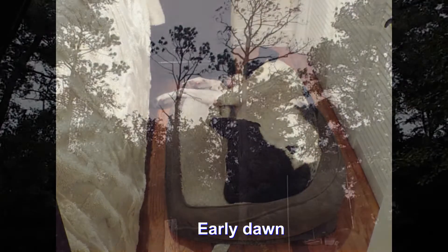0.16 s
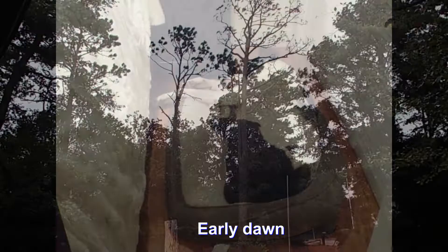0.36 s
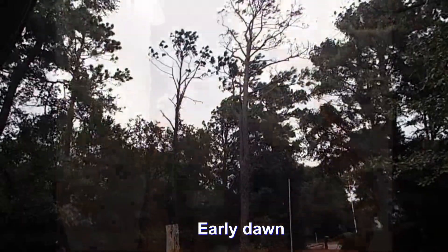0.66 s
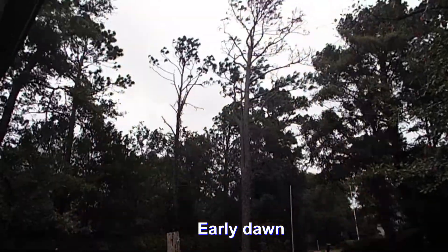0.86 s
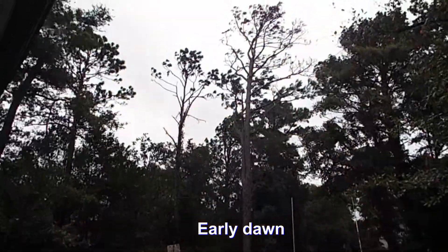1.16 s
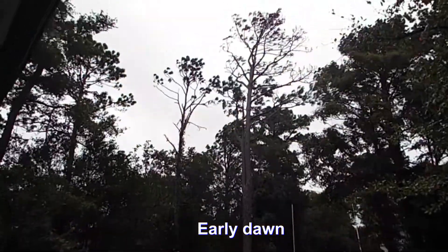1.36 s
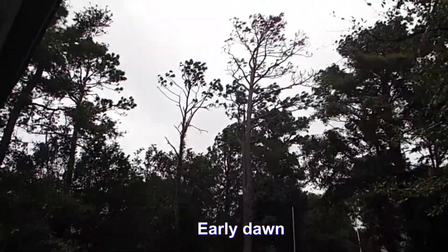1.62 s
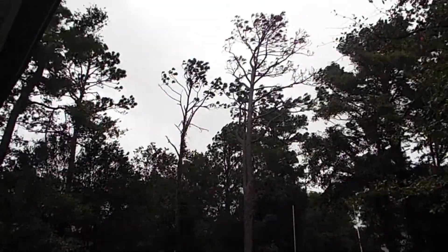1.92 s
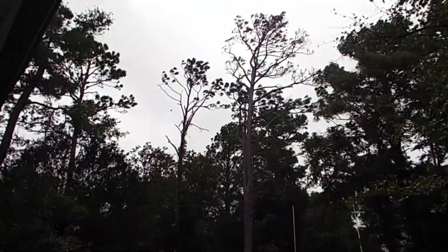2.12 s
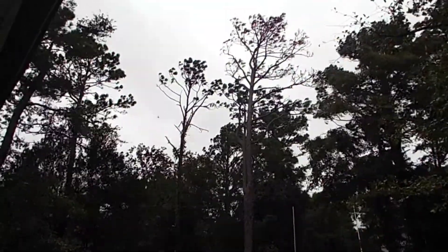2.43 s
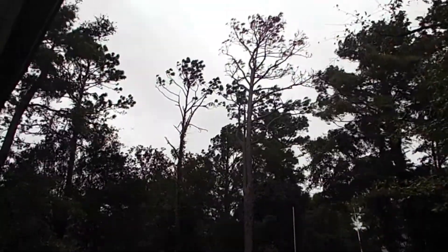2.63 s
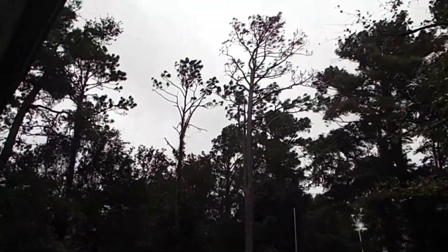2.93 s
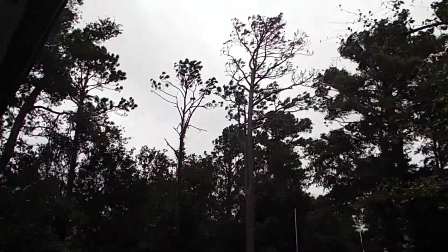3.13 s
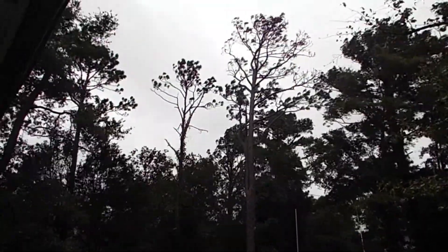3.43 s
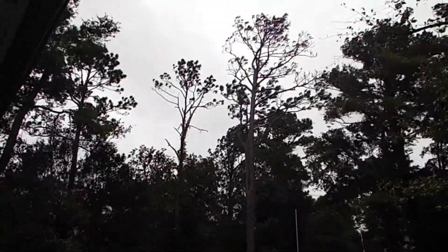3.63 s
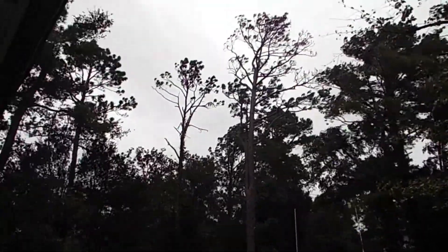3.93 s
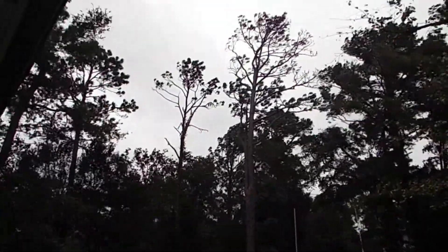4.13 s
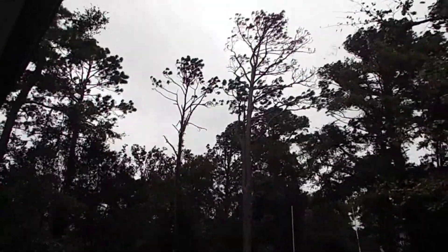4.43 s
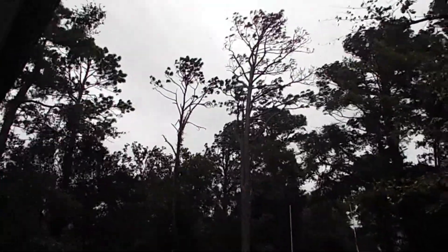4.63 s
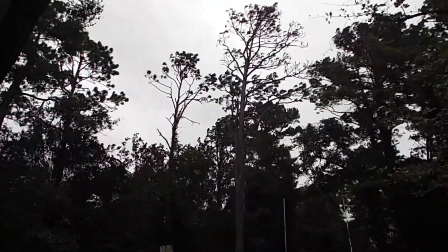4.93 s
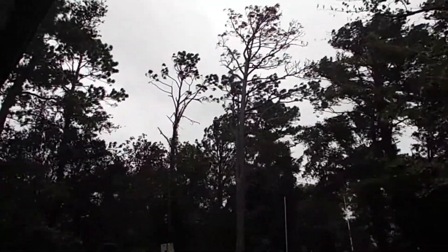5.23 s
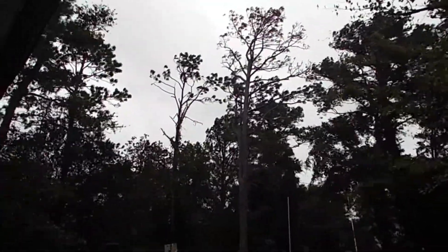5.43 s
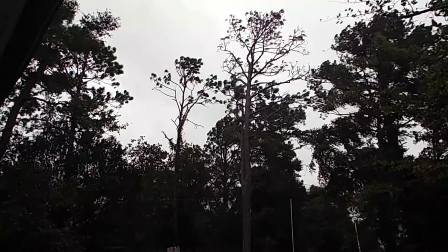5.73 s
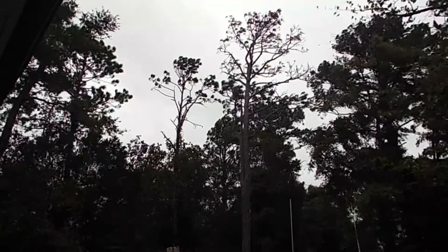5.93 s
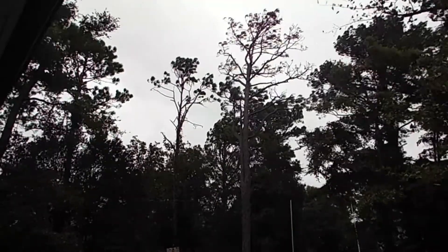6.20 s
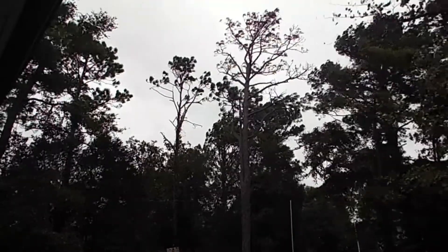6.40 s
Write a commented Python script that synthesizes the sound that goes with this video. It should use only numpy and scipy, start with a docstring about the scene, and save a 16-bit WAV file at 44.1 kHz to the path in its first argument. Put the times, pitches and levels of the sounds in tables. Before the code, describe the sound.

A storm gust builds in tall trees, needles hissing over a softer bough roar, with dry leaf ticks and faint low microphone bumps.

```python
"""A stand of tall pines: a storm gust builds, peaks after about five and a half seconds and eases.
Boughs roar, twigs rush, needles hiss and sizzle: filtered noise that follows the gust, with one short echo.
Dry leaves tick: random clicks through short resonances, denser and louder in the gust.
Eddies bump and a breeze rumbles at the microphone: low noise in short puffs and slow spells.
Its two close ports differ only in the treble and in this low wind noise."""
import sys
import numpy as np
from scipy import signal
from scipy.fft import rfft, irfft
from scipy.io import wavfile

SR = 44100
rng = np.random.default_rng(int(sys.argv[2]) if len(sys.argv) > 2 else 0)


def store_wav(level_fs):
    """Save 16-bit WAV to argv[1]."""
    pcm = np.round(np.clip(np.atleast_2d(level_fs), -1, 1) * 32767)
    wavfile.write(sys.argv[1], SR, pcm.T.astype(np.int16))


N = 289296
T = np.arange(N) / SR
HZ = np.maximum(np.arange(N // 2 + 1) * SR / N, 1)
SIDES = np.array([[1], [-1]])  # left, right

# relative colour of the wind in the trees: pitch_hz, density_db
TREE_COLOUR = [(25, -52), (100, -22.5), (180, -13.5), (310, -4), (480, -2.5), (680, -2.1), (950, -3.5),
               (2700, -5), (4100, -2), (5250, 0), (6300, -3), (7600, -7.5), (10500, -12.5), (15200, -29)]


def from_db(db):
    """Decibels to gain."""
    return 10 ** (np.asarray(db) / 20)


def rms_one(x):
    """Scale to rms 1, over all channels together."""
    return x / np.sqrt(np.mean(x ** 2) + 1e-20)


def over_hz(points):
    """Interpolate (Hz, value) points on a log-frequency axis."""
    hz, value = np.transpose(points)
    return np.interp(np.log(HZ), np.log(hz), value)


def white(channels):
    """Spectra of independent white noises."""
    return rfft(rng.standard_normal((channels, N)))


def drift(corner_hz):
    """Slow random wander of rms 1: noise low-passed at corner_hz."""
    return rms_one(irfft(white(channels=1)[0] / (1 + (HZ / corner_hz) ** 2), N))


def at_ports(pair):
    """Mix two independent spectra to left and right: alike while waves are long against the port spacing."""
    # likeness of the ports: pitch_hz, correlation
    likeness = [(700, 1.0), (1700, 1), (2000, 1), (2600, 0.99), (3800, 0.91), (6000, 0.88), (8000, 0.74),
                (10500, .6), (12500, 0.57), (15000, .22)]
    # left over right: pitch_hz, balance_db
    balance = [(3000, 0), (5000, 1.1), (5900, -0.5), (7000, .5), (8500, 0.3), (11300, 3.5), (15000, -1)]
    # lead of the left port: pitch_hz, phase_rad
    phase = [(3200, 0), (5300, -0.1), (8500, -.12), (12300, -0.5), (15000, -.55)]
    alike = np.clip(over_hz(likeness), 0, 1)
    common = np.sqrt(1 + alike) * pair[0]
    opposed = SIDES * np.sqrt(1 - alike) * pair[1]
    gain = from_db(SIDES * over_hz(balance) / 2)
    turn = np.exp(.5j * SIDES * over_hz(phase))
    return (common + opposed) * gain * turn


def with_echo(spectrum):
    """One dull reflection off a nearby surface lays a faint ripple over the spectrum."""
    delay_s, echo_db, cut_hz = 0.00156, -16.5, 1400
    delay = np.exp(-2j * np.pi * HZ * delay_s)
    dulling = 1 / (1 + (HZ / cut_hz) ** 4)
    return spectrum * (1 + from_db(echo_db) * delay * dulling)


def gust_level(strong_db, follows, lead_s):
    """Level of one size of wood: high crowns meet the gust first, the finest parts answer most steeply."""
    # gust in the nearest trees: time_s, strength_db
    gust = [(0.75, -28.5), (1.75, -25.1), (2.3, -23.5), (3.05, -22.5), (3.5, -20), (4.1, -18.5), (4.9, -18),
            (5.45, -17.0), (5.8, -18.5), (6.4, -21), (6.8, -24.5)]
    strong_wind_db = -18
    strength_db = np.interp(T + lead_s, *np.transpose(gust))
    return strong_db + follows * (strength_db - strong_wind_db)


def shedding(size, level_db, sway_db, sway_hz):
    """Eddies shed by one size of wood (0 boughs .. 3 needle tips): thinner is higher; swaying makes it swell."""
    # roar to rush, rush to hiss, hiss to sizzle: crossover_hz
    crossovers = [900, 3000, 7000]
    below = [0] + [1 / (1 + (HZ / hz) ** 8) for hz in crossovers] + [1]
    band = np.sqrt(np.maximum(below[size + 1] - below[size], 0))
    colour = from_db(over_hz(TREE_COLOUR)) * band
    noise = irfft(with_echo(at_ports(white(channels=2) * colour)), N)
    mono_rms = noise.mean(axis=0).std()
    return noise / mono_rms * from_db(level_db + sway_db * drift(sway_hz))


def leaves(hiss_db, peak_per_s, spread_db, under_db, cycles):
    """Leaves and twig ends knock together, more often in the gust; each tick falls 60 dB in some cycles."""
    peak_db = hiss_db.max()
    chance = peak_per_s / SR * from_db(hiss_db - peak_db)
    pitches_hz = np.geomspace(3200, 10000, num=10)
    ticks = np.zeros((2, N))
    for side in ticks:
        born = rng.random(N) < chance
        heights_db = spread_db * np.minimum(rng.exponential(1, N), 5)
        heights = from_db(heights_db) * rng.choice([-1, 1], N)
        leaf = rng.integers(len(pitches_hz), size=N)
        for k, hz in enumerate(pitches_hz):
            r = from_db(-60 * hz / (cycles * SR))  # decay per sample
            w = 2 * np.pi * hz / SR
            clicks = heights * (born & (leaf == k)) + 1e-18
            resonance = [np.sin(w), 0, -np.sin(w)], [1, -2 * r * np.cos(w), r * r]
            side += signal.lfilter(*resonance, clicks)
    rustle = irfft(at_ports(rfft(ticks) * from_db(over_hz(TREE_COLOUR))), N)
    # tick rate carries part of the swell, so tick loudness follows only half the gust in dB
    return rms_one(rustle) * from_db((hiss_db + peak_db) / 2 + under_db)


def buffets(low_cut_hz):
    """Eddies hit the microphone: short dull puffs of turbulence; those that reach higher pass sooner."""
    # eddies: time_s, level_db, top_hz, left_over_right_db
    eddies = [(.285, -54, 110, 2), (.365, -57, 100, 0), (.905, -48, 260, 5), (1.145, -44, 150, -3),
              (1.254, -36, 260, -6), (1.402, -34, 260, -4), (5.071, -39, 350, -4), (5.302, -31, 550, -1),
              (5.348, -31, 560, 2), (5.63, -40, 350, 1)]
    ref_length_s, ref_top_hz = .014, 300  # length: centre to 1/e
    out = np.zeros((2, N))
    for time_s, level_db, top_hz, pan_db in eddies:
        length_s = ref_length_s * np.sqrt(ref_top_hz / top_hz)
        edges_hz = [min(low_cut_hz, top_hz / 2), top_hz]
        band = signal.butter(3, edges_hz, "band", fs=SR, output="sos")
        swell = np.exp(-((T - time_s) / length_s) ** 2)
        puff = signal.sosfilt(band, rng.standard_normal((2, N))) * swell
        puff /= np.sqrt(np.sum(puff ** 2, axis=1, keepdims=True) / np.sum(swell ** 2))
        out += puff * from_db(level_db + SIDES * pan_db / 2)
    return out


def port_air(lumpy_db):
    """Breeze over the ports: lumpy rumble, independent at each; every spell swells and dies away."""
    # relative colour of the rumble: pitch_hz, density_db
    colour = [(15, -22), (35, -13), (70, -2), (120, 2), (280, 0), (480, -7), (800, -21), (2000, -24)]
    # spells of breeze: time_s, rumble_db, length_s (centre to 1/e)
    spells = [(.45, -64, .25), (1.05, -56, .22), (2.75, -55, 0.26), (5.3, -49, 0.43)]
    calm_db = -68  # floor under the spells
    rumble = rms_one(irfft(white(channels=2) * from_db(over_hz(colour)), N))
    flow = from_db(calm_db)
    for time_s, rumble_db, length_s in spells:
        flow = flow + from_db(rumble_db) * np.exp(-((T - time_s) / length_s) ** 2)
    return rumble * flow * from_db(lumpy_db * drift(corner_hz=8))


def scene():
    """One gust drives all parts of the trees; eddies and breeze act on the microphone."""
    # response to the gust: level_in_strong_wind_db, db_per_gust_db, lead_s
    boughs = (-28, 0.84, 0.26)
    twigs = (-23.5, 0.77, 0.2)
    needles = (-18.5, 1, 0)
    needle_tips = (-25.5, 1.15, -0.078)
    hiss_db = gust_level(*needles)
    roar = shedding(size=0, level_db=gust_level(*boughs), sway_db=0.33, sway_hz=5)
    rush = shedding(size=1, level_db=gust_level(*twigs), sway_db=0.35, sway_hz=6)
    hiss = shedding(size=2, level_db=hiss_db, sway_db=0.21, sway_hz=9)
    sizzle = shedding(size=3, level_db=gust_level(*needle_tips), sway_db=0.35, sway_hz=14)
    rustle = leaves(hiss_db, peak_per_s=1500, spread_db=3.0, under_db=-13.5, cycles=25)
    trees = roar + rush + hiss + sizzle + rustle
    return trees + buffets(low_cut_hz=105) + port_air(lumpy_db=2.0)


def record(dry):
    """The sound fades in; the top is cut steeply."""
    fade_in_s, fade_from_db, cutoff_hz = .75, -13, 15200
    fade = np.interp(T, [0, fade_in_s], [from_db(fade_from_db), 1])
    low_pass = 1 / np.sqrt(1 + (HZ / cutoff_hz) ** 400)
    return irfft(rfft(dry * fade) * low_pass, N)


dry = scene()
out = record(dry)
store_wav(out)
```